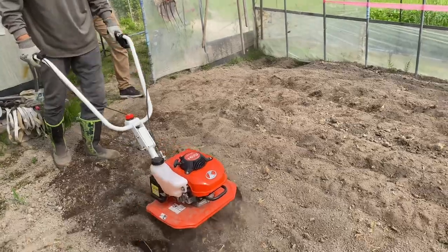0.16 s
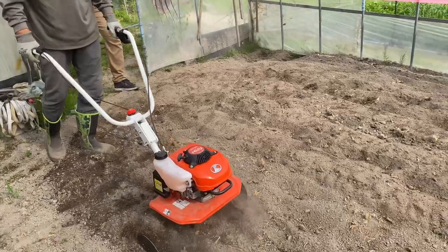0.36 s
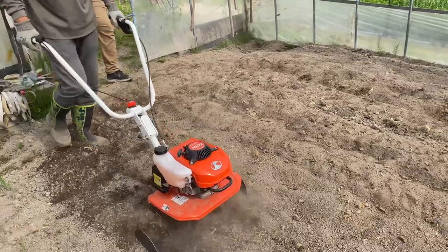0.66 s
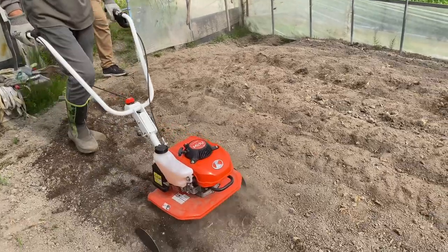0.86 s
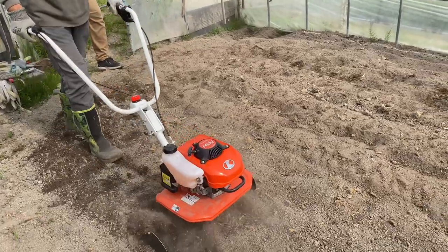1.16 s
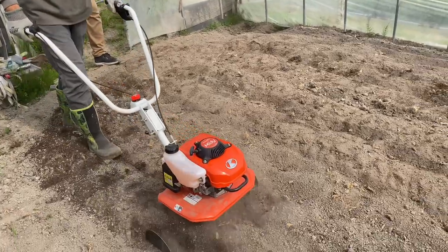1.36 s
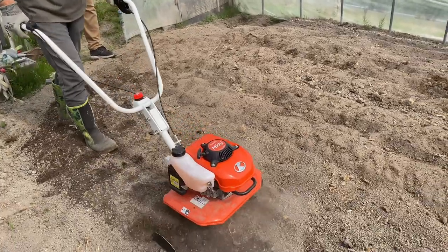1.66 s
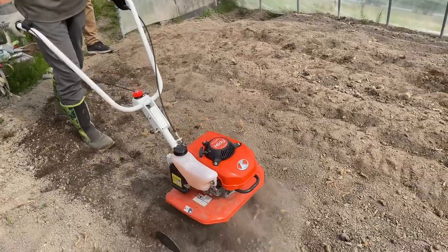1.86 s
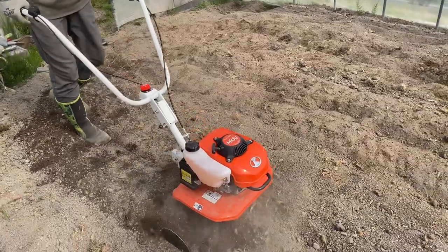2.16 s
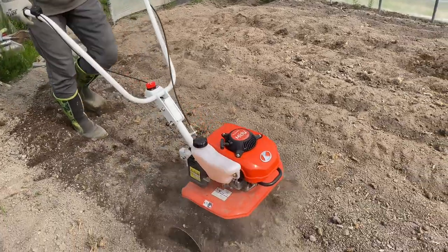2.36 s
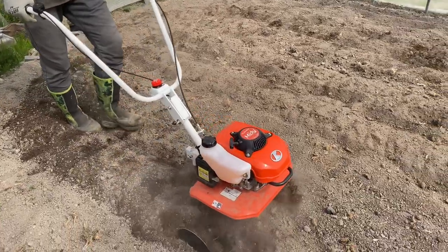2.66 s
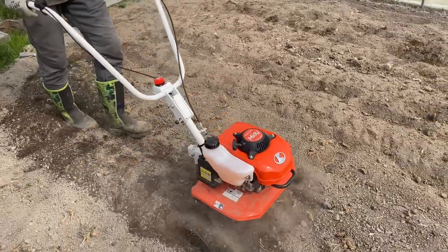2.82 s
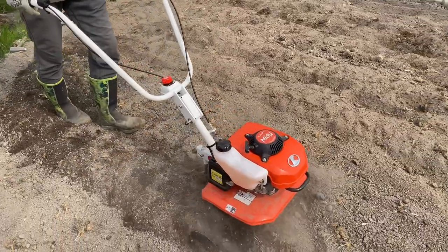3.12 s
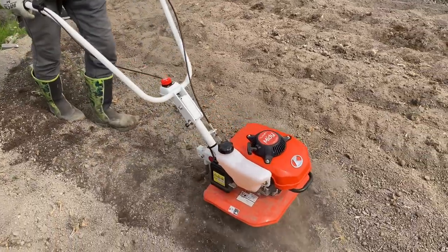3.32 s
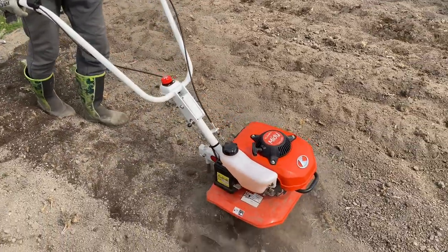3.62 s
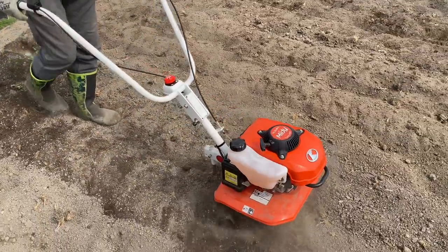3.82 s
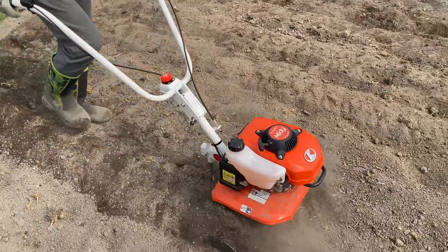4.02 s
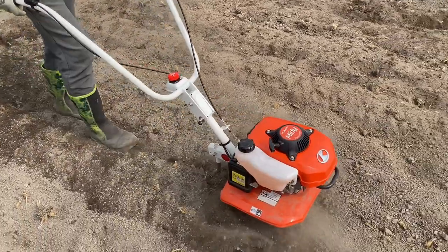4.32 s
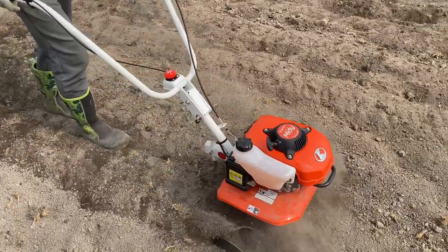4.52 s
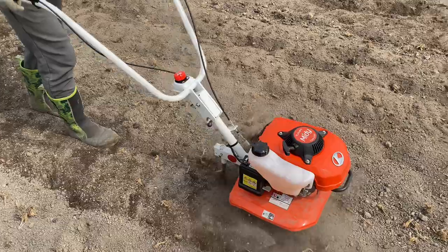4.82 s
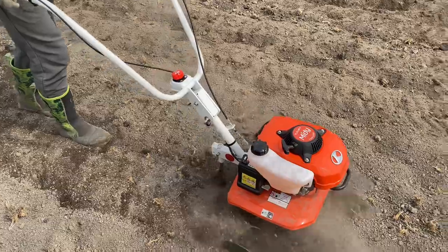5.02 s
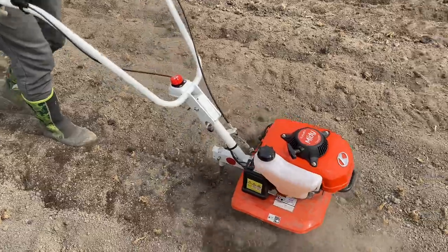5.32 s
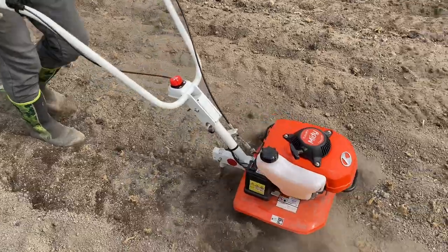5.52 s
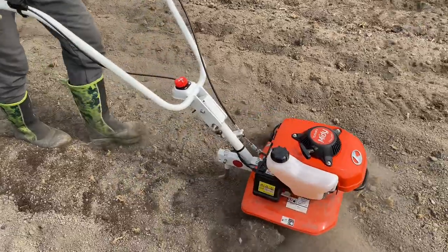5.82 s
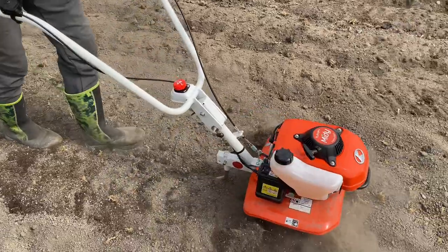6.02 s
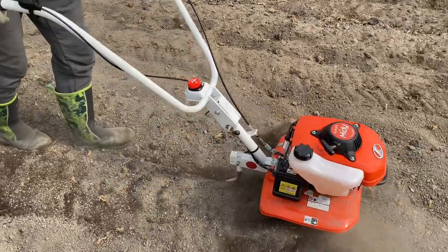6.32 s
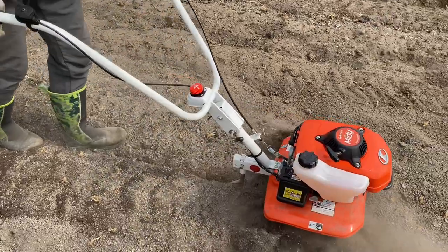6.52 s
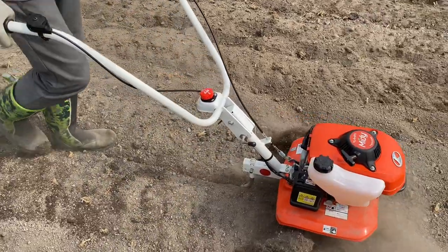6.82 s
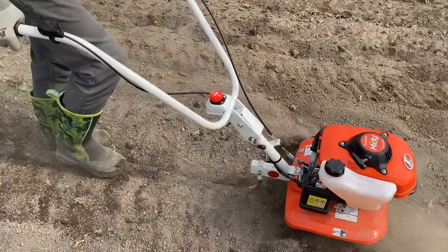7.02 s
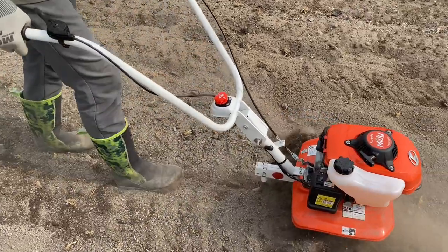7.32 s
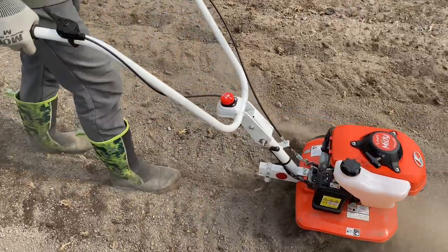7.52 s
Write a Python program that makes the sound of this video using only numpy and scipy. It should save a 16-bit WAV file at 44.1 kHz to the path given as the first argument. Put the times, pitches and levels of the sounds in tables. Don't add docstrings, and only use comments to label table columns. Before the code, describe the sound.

A small petrol tiller engine roars steadily at full throttle up close, rattling and whining while its tines churn dry soil.

```python
import sys
import numpy as np
from scipy import signal
from scipy.fft import rfft, irfft, next_fast_len
from scipy.io import wavfile
from scipy.ndimage import uniform_filter1d, map_coordinates

SR = 44100
rng = np.random.default_rng(int(sys.argv[2]) if len(sys.argv) > 2 else 0)


def persist_wave(psi):
    counts = np.round(np.clip(psi, -1, 1) * 32767).astype(np.int16)
    wavfile.write(sys.argv[1], SR, np.atleast_2d(counts).T)


def boost_factor(decibels):
    exponent = np.asarray(decibels, float) / 20
    return 10 ** exponent


N = 338247

# t/s, left minus right level/dB
PASSING_BALANCE = [(0, 3.5), (2.5, 2.5), (4, 2), (6.6, 2.5), (7.67, 2.5)]
# share of cycle [1], level/dB
EXHAUST_PUFFS = [
    (.01, 0),
    (.21, -16),
    (.325, -6),
    (.5, -16),
]
# f/Hz, bandwidth/Hz, level/dB
CHAMBER_MODES = [(322, 40, 6)]
BAFFLE_MODES = [(467, 96, 0)]
TAILPIPE_MODES = [(598.6, 107, 0)]
OUTLET_MODES = [(739.5, 109, 0.5), (930, 79.8, -9)]
# f/Hz, bandwidth/Hz, level/dB
COWL_MODES = [(1700, 132, 2), (1856, 144, 4), (2303, 590, -8.5)]
VALVE_MODES = [(6440, 130, -2.5), (6680, 116, 0.5), (7130, 420, -2.5)]
# f/Hz, bandwidth/Hz, level/dB, loudest at t/s, duration/s
PANEL_MODES = [(2089, 140, -3.5, 1.7, 0.64), (2359, 99.5, 3.5, 6.3, 0.61), (2210, 110, -10, 6.21, 0.41),
               (2740, 100, 0, 2.87, 1.5), (3020, 43, -6, 6, 3.4), (3695, 150.5, -4.5, 5.1, 2.4),
               (3597, 88, -4, 1.9, 0.54), (4300, 47, -10, 0.73, 0.4), (4791, 150, -7, 4.2, 2.9),
               (3859, 75, -6, 6.78, 0.87)]
# f/Hz, level per Hz/dB
RATTLE_SPECTRA = [
    [(820, -4), (1400, -8), (1610, -22), (1750, 1.5), (2550, -7), (4640, -9), (5500, -10.5), (7070, -11.5), (8200, -23), (10700, -52), (18000, -120)],
    [(820, -43), (1400, -7.5), (1850, -3), (2100, -3.5), (2350, -3.5), (3180, -7), (5710, -16), (6970, -20), (8200, -22), (10700, -52), (18000, -120)],
]
# f/Hz, level per Hz/dB
AIR_SPECTRUM = [(5000, -27), (7500, -1.5), (9000, 2.5), (12000, -2), (14000, -3.5), (15900, -8.5)]
SOIL_SPECTRUM = [(20, -26), (45, -9), (100, -7.5), (250, -5.5), (600, -8), (900, -5), (1300, -67)]
GUARD_SPECTRUM = [(600, -62), (850, -1.5), (1000, -2.5), (1300, 0.5), (1550, -2), (2000, -40)]
# f/Hz, left minus right level/dB
PORT_LEAN = [(60, 4), (300, 5), (700, 1), (1300, -0.5), (2400, -0.5), (4400, 4.5), (6500, 2.5), (8500, 0.5)]
# f/Hz, coherence [1]
PORT_COHERENCE = [(60, 1), (250, .97), (700, .85), (1400, .8), (3000, .7), (5000, .45), (6200, .34),
                  (7400, .44), (8400, .88), (16000, .92)]
# f/Hz, phase by which left leads [rad]
PORT_PHASE = [(60, 0), (200, -.2), (450, -.72), (1460, -.6), (2840, .6), (5600, 0), (7000, 0),
              (9000, -3.14), (11050, -6.28), (12400, -8.35), (13350, -9.42), (15200, -12.57),
              (17000, -14.5)]
# t/s, duration/s, firing rate lost [Hz]
SOIL_BITES = [(0.061, 0.33, 1.37), (0.517, 0.16, 2.9), (0.697, 0.14, 0.97), (0.94, 0.17, 2.0),
              (1.119, 0.19, 0.83), (1.482, 0.32, 1.61), (1.83, 0.2, 1.83), (2.053, 0.15, 2.9),
              (2.197, 0.12, 1.73), (2.486, 0.38, 0.9), (2.826, 0.35, 1.6), (3.276, 0.45, 1.65),
              (3.719, 0.12, 1.6), (3.982, 0.32, 0.83), (4.154, 0.29, 1.26), (4.548, 0.342, 1.35),
              (4.954, 0.21, 2.08), (5.172, 0.082, 2.07), (5.419, 0.38, 1.39), (5.655, 0.55, 0.61),
              (6.005, 0.089, 3.86), (6.643, 0.117, 2), (6.764, 0.307, 1.1), (6.973, 0.25, 1.4),
              (7.264, 0.19, 2.14), (7.544, 0.51, 1.1)]
# t/s, heading [0 nose on, 1 flank on]
HEADING = [(0, 0.071), (.9, 0.16), (1.5, 0.29), (2.1, 0.37), (2.6, 0.46), (3.4, 0.56), (4.4, 0.68),
           (5.2, 0.73), (6, 0.81), (6.4, 0.96), (7.67, 0.94)]
DIRECTIVITY = {"crank": (-18, -16, -17, -20, 0.1), "pumping": (-39, -37.5, -24, -24.5, 0.5),
               "boom": (-14.5, -14.5, -17, -17.5, 0.3), "chamber": (-22.5, -24, -22.5, -29, 2.6),
               "baffle": (-25, -23.5, -22, -20, -1.8), "tailpipe": (-25.5, -32.5, -19.5, -20.5, 0),
               "outlet": (-33, -28, -24, -22, -1), "fan": (-26, -19.5, -27.5, -28.5, -1.6),
               "cowl": (-28, -18.5, -15, -22, 0.3), "rattle": (-21, -21, -22, -23, 0),
               "valve": (-27, -24.5, -28, -30, -1.1), "air": (-28.5, -27.5, -28, -30, -0.5),
               "guard": (-27, -26, -29.5, -31, 0), "earth": (-28.5, -27, -24.5, -24.5, 1)}

FREE_HZ = 40.33
FULL_LOAD_HZ = 2
GRAB_S, LET_GO_S = 0.0435, 0.0733
START, PIPE_LAG = -.11, .026
TOP_HZ = 15830


def unit(x):
    return x / np.sqrt(np.mean(x ** 2) + 1e-20)


def along(points, hz):
    f, v = np.transpose(points)
    return np.interp(np.log(hz + 1), np.log(f + 1), v)


def curves(rows):
    s, *cols = np.transpose(rows)
    return [np.interp(np.arange(N) / SR, s, c) for c in cols]


def wobble(rate):
    t = np.arange(0, N + 32, 32)
    knots = rng.standard_normal(int(N * rate / SR) + 4)
    return np.interp(np.arange(N), t, map_coordinates(knots, [t * rate / SR]))


def filtered(x, response):
    m = next_fast_len(N + SR // 4)
    return irfft(rfft(x, m) * response(np.fft.rfftfreq(m, 1 / SR)), m)[..., :N]


def resonant(x, modes):
    def response(f):
        total = 0
        for k, (center, width, db) in enumerate(modes):
            damping = 1j * f * width
            total = total + (-1) ** k * boost_factor(db) * damping / (center * center - f * f + damping)
        return total
    return unit(filtered(x, response))


def hiss(spectrum, patchy_db):
    z = signal.stft(rng.standard_normal(N), nperseg=512)[2]
    field = uniform_filter1d(uniform_filter1d(rng.standard_normal(z.shape), 5, 0), 12, 1)
    noise = signal.istft(z * boost_factor(patchy_db * unit(field)), nperseg=512)[1][:N]
    return unit(filtered(noise, lambda hz: boost_factor(along(spectrum, hz)) * (hz < spectrum[-1][0])))


def gate(cycle, at, width, depth_db):
    return boost_factor(depth_db * np.exp((np.cos(2 * np.pi * (cycle - at)) - 1) / (2 * np.pi * width) ** 2))


def strokes(cycle, pattern, jitter_s, scatter_db):
    out, whole = np.zeros(N), np.arange(int(cycle[-1]))
    for share, db in pattern:
        chance = rng.standard_normal((len(whole), 2))
        at = np.interp(whole + share, cycle, np.arange(N)) + jitter_s * SR * chance[:, 0]
        out += np.bincount(np.clip(at, 0, N - 1).astype(int), boost_factor(db + scatter_db * chance[:, 1]), N)
    return out


def shaft_order(cycle, k):
    return np.sqrt(2) * boost_factor(1.0 * wobble(20)) * np.cos(2 * np.pi * k * cycle + 1.3 * wobble(26))


def drag():
    t = np.arange(0, N + 64, 64) / SR
    step = lambda u: (1 + np.tanh(u)) / 2
    lost = sum(hz * step((t - s) / GRAB_S) * step((s + span - t) / LET_GO_S) for s, span, hz in SOIL_BITES)
    return np.interp(np.arange(N) / SR, t, lost)


def heard(part, unsteady_db, rate=5):
    *views_db, per_hz = DIRECTIVITY[part]
    heading, = curves(HEADING)
    load = FULL_LOAD_HZ * np.tanh(drag() / FULL_LOAD_HZ)
    view_db = np.interp(heading, np.linspace(0, 1, len(views_db)), views_db)
    return view_db + per_hz * (load - load.mean()) + unsteady_db * wobble(rate)


def scattered(x):
    t = np.arange(SR // 4) / SR
    tail = rng.standard_normal(len(t)) * boost_factor(-60 * t / .3)
    return filtered(x, lambda hz: np.exp(1j * np.angle(rfft(tail, 2 * len(hz) - 2))))


def soil():
    guard_db = heard("guard", 0.58)
    earth = boost_factor(heard("earth", 1.9)) * hiss(SOIL_SPECTRUM, patchy_db=0.5)
    return earth + boost_factor(guard_db + 4.5) * hiss(GUARD_SPECTRUM, patchy_db=1.0)


def cooling_air(cycle):
    level = boost_factor(heard("air", .6) + 0.82 * wobble(14))
    surge = gate(2 * cycle, 0.62, 0.17, depth_db=0.5) * gate(2 * cycle, 0.76, 0.19, depth_db=2.5)
    return level * surge * hiss(AIR_SPECTRUM, patchy_db=0.9)


def panels(strand_db):
    hz, t, z = signal.stft(rng.standard_normal(N), SR, nperseg=2048)
    hz = hz[:, None]
    power = 0
    for center, width, db, s, span in PANEL_MODES:
        facing = np.exp(-((t - s) / span) ** 2)
        power = power + boost_factor(2 * db) * facing / (1 + (2 * (hz - center) / width) ** 2)
    field = rng.standard_normal(z.shape)
    strands = unit(uniform_filter1d(uniform_filter1d(field, size=2, axis=0), size=14, axis=1))
    return unit(signal.istft(z * np.sqrt(power) * boost_factor(strand_db * strands), SR, nperseg=2048)[1][:N])


def rattle(cycle):
    level = boost_factor(heard("rattle", .5) + 1.74)
    shake = unit(gate(2 * cycle, 0.58, 0.25, depth_db=3.0) * boost_factor(0.98 * wobble(90)))
    turned = np.pi / 2 * np.clip(curves(HEADING)[0], 0, 1)
    front, flank = [hiss(spectrum, patchy_db=1.2) for spectrum in RATTLE_SPECTRA]
    return level * shake * (np.cos(turned) * front + np.sin(turned) * flank + 0.47 * panels(strand_db=5.0))


def valves(cycle):
    level = boost_factor(heard("valve", .8) - 1.5)
    snap = gate(cycle, 0.742, 0.05, depth_db=10.5) * gate(cycle, 0.25, 0.039, depth_db=5)
    snap = unit(snap * gate(cycle, 0.47, 0.063, depth_db=5.5) * boost_factor(1.1 * wobble(30)))
    return level * resonant(snap * rng.standard_normal(N), VALVE_MODES)


def cowl(cycle):
    cowl_db = heard("cowl", 0.44)
    order = lambda k: shaft_order(cycle, k)
    slap = gate(2 * cycle, -0.096, 0.19, depth_db=11.5) * gate(cycle, -0.038, 0.33, depth_db=7.5)
    slap = unit(slap * boost_factor(0.53 * wobble(40)))
    mesh = .7 * order(48) + order(47) + .3 * order(45) + .3 * order(49)
    teeth = resonant(slap * mesh, COWL_MODES) + .35 * order(47) + .25 * order(48)
    knocks = resonant(slap * rng.standard_normal(N), COWL_MODES)
    return boost_factor(cowl_db - 5.0) * teeth + boost_factor(cowl_db - 6.0) * knocks


def fan(cycle):
    fan_db = heard("fan", 0.79)
    throb = unit(gate(2 * cycle, 0.77, 0.12, depth_db=4) * gate(cycle, 0.25, 0.16, depth_db=6))
    return throb * (boost_factor(fan_db - 3) * shaft_order(cycle, 32) + boost_factor(fan_db - 10) * shaft_order(cycle, 24))


def casing(cycle):
    return fan(cycle) + cowl(cycle) + valves(cycle) + rattle(cycle) + cooling_air(cycle)


def thump(cycle):
    crank_db, pump_db, boom_db = heard("crank", 0.51), heard("pumping", 1.4), heard("boom", 0.54)
    levels = [crank_db - 17.0, crank_db, crank_db - 5.5, pump_db, boom_db - 2.0, boom_db - 6]
    out = np.zeros(N)
    for k, db in enumerate(levels, 1):
        lead = k * (.85 if k % 2 else .3) - .6
        out += np.sqrt(2) * boost_factor(db + 0.38 * wobble(22)) * np.cos(k * 2 * np.pi * cycle + lead)
    return out


def bark(cycle):
    chamber_db, baffle_db = heard("chamber", .8), heard("baffle", 0.52)
    pipe_db, outlet_db = heard("tailpipe", 1.0), heard("outlet", 0.45)
    puffs = strokes(cycle, EXHAUST_PUFFS, jitter_s=.00005, scatter_db=.9)

    def steep(modes):
        broader = [(hz, 1.67 * width, db) for hz, width, db in modes]
        return resonant(resonant(puffs, modes), broader)
    gas = gate(cycle, .05, 0.17, depth_db=11) * rng.standard_normal(N)
    breath = boost_factor(-13) * resonant(gas, TAILPIPE_MODES)
    inner = boost_factor(chamber_db - 1.5) * steep(CHAMBER_MODES) - boost_factor(baffle_db - 2) * steep(BAFFLE_MODES)
    pipe = boost_factor(pipe_db - 1.2) * (steep(TAILPIPE_MODES) + breath)
    return inner + pipe - boost_factor(outlet_db - 0.3) * steep(OUTLET_MODES)


def machine():
    cycle = START + np.cumsum(FREE_HZ - drag()) / SR
    return thump(cycle) + bark(cycle - PIPE_LAG), casing(cycle) + soil()


def scene():
    exhaust, noises = machine()
    both = np.array([1.027 * exhaust + noises, scattered(noises)])
    sides = []
    for sign in (1, -1):
        def port(hz):
            turn = np.arccos(np.clip(along(PORT_COHERENCE, hz), 0, 1)) / 2
            phase = np.interp(hz, *np.transpose(PORT_PHASE))
            gain = boost_factor(sign * along(PORT_LEAN, hz) / 2) * np.exp(.5j * sign * phase)
            return gain * [np.cos(turn), sign * np.sin(turn)]
        sides.append(filtered(both, port).sum(0))
    pan_db, = curves(PASSING_BALANCE)
    return np.array(sides) * boost_factor(np.outer([.5, -.5], pan_db - pan_db.mean()))


def joint_stereo(x, weaker_db, from_hz, thin_db, thin_hz, size=16):
    hz, _, z = signal.stft([x[0] + x[1], x[0] - x[1]], SR, nperseg=2048)
    bands = abs(z[:, :-1].reshape(2, -1, size, z.shape[2])) ** 2
    power = uniform_filter1d(bands.sum(2), size=3, axis=2)
    mood_db = unit(uniform_filter1d(rng.standard_normal(power.shape), size=4, axis=2))
    weak = np.repeat(power < power[::-1] * boost_factor(2 * weaker_db + 3 * mood_db), size, axis=1)
    z[:, :-1] *= ~(weak & (hz[:-1, None] > from_hz))
    patch = uniform_filter1d(uniform_filter1d(abs(z) ** 2, size=6, axis=1), size=2, axis=2)
    faint = patch < boost_factor(2 * thin_db) * uniform_filter1d(patch, size=25, axis=2).max(0)
    z *= ~(faint & (hz[:, None] > thin_hz))
    mid, side = signal.istft(z * (hz[:, None] < TOP_HZ), SR, nperseg=2048)[1][:, :N]
    return np.array([mid + side, mid - side]) / 2


def top_cut(x):
    return signal.sosfilt(signal.butter(12, 16790, fs=SR, output="sos"), x)


def record(dry):
    soft = dry / (1 + np.abs(dry / 1.13) ** 5) ** (1 / 5)
    mix = joint_stereo(soft, weaker_db=-4.5, from_hz=6300, thin_db=-2.5, thin_hz=13700)
    return top_cut(mix)


dry = scene()
out = record(dry)
persist_wave(out)
```